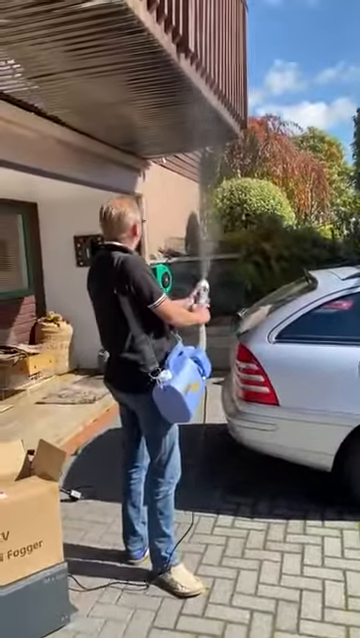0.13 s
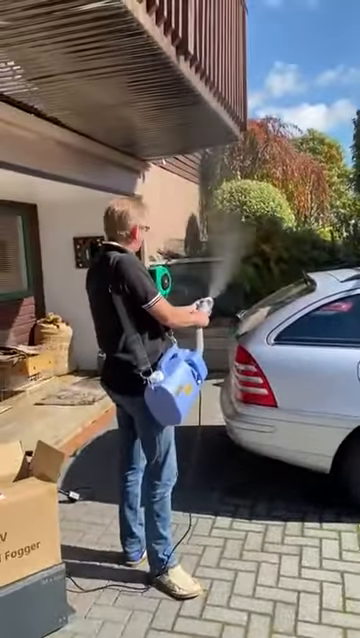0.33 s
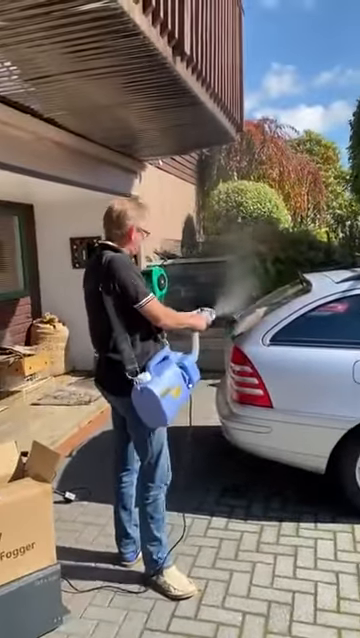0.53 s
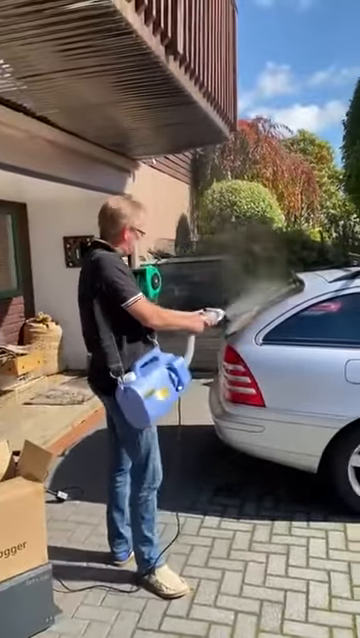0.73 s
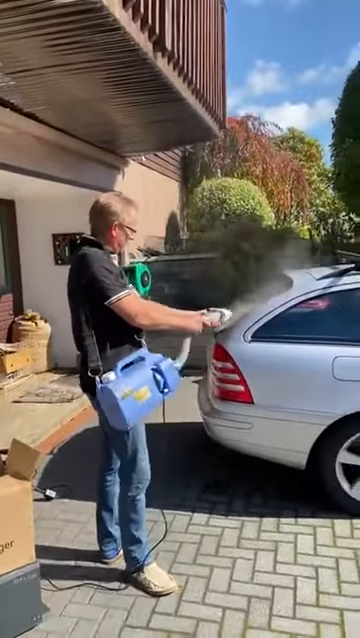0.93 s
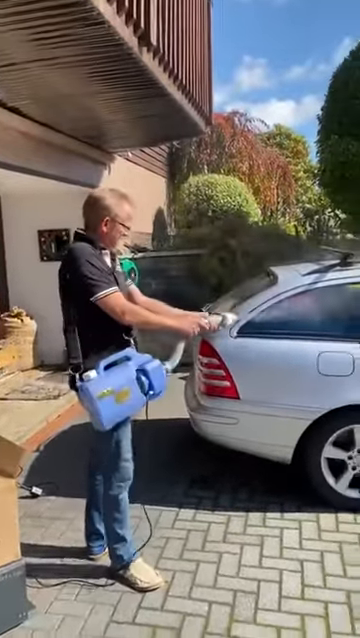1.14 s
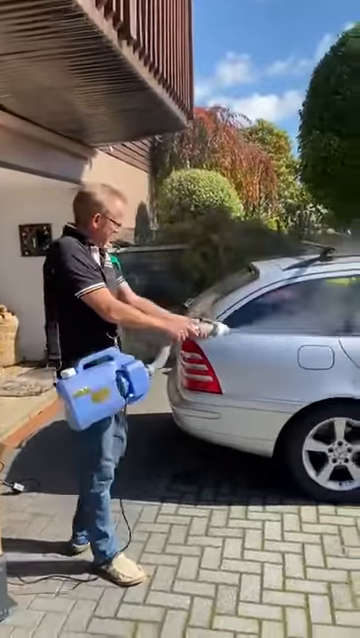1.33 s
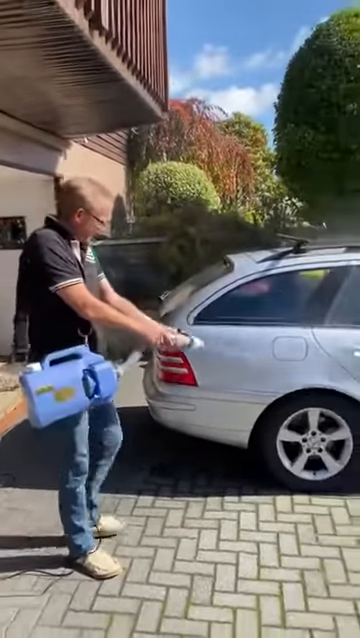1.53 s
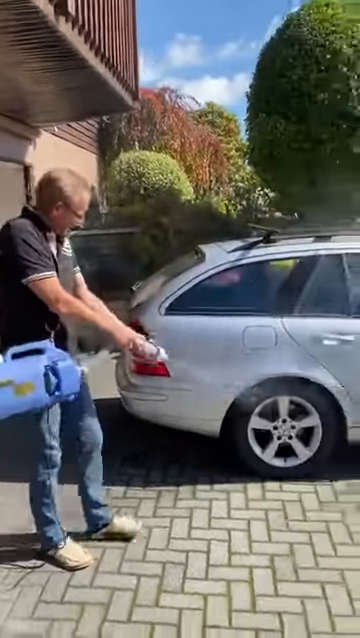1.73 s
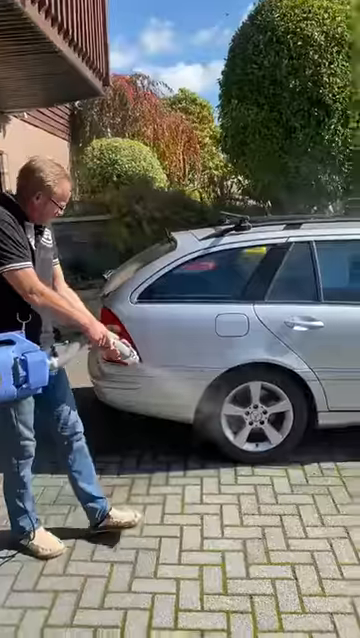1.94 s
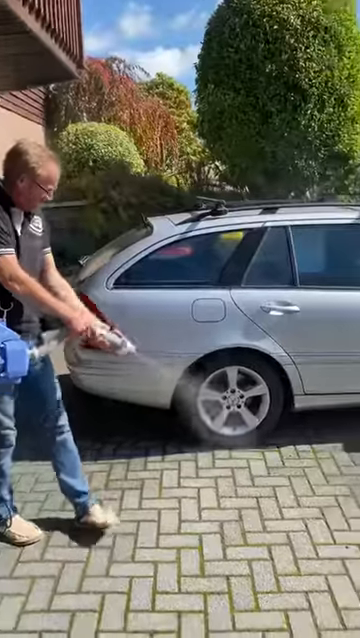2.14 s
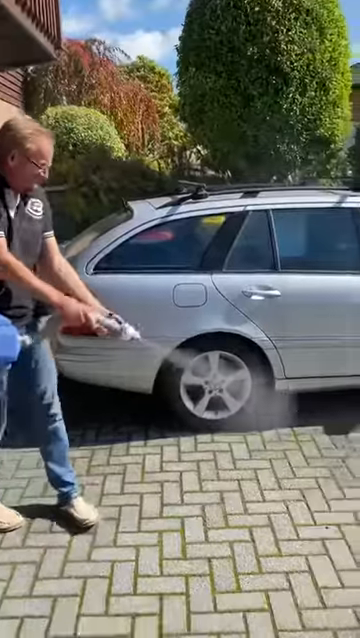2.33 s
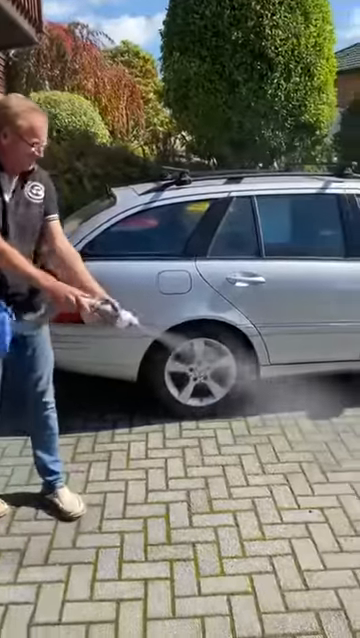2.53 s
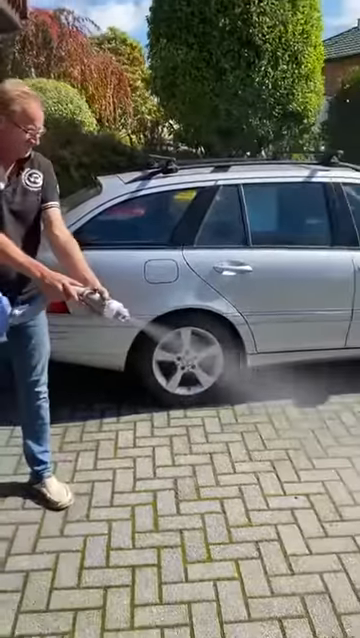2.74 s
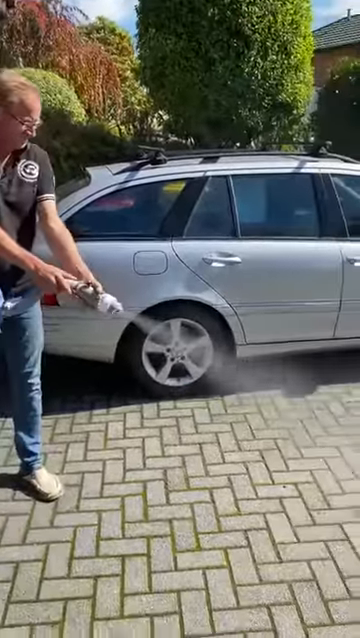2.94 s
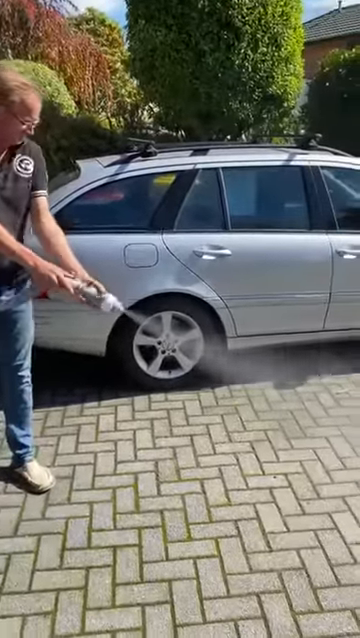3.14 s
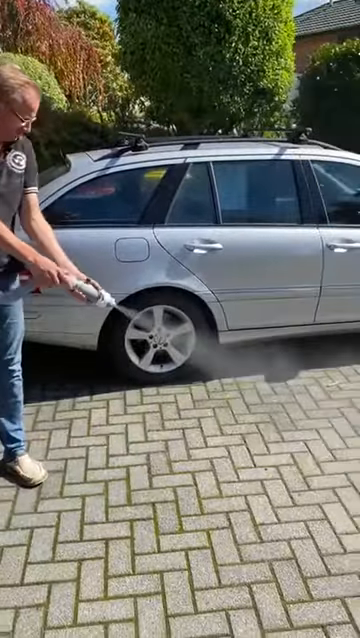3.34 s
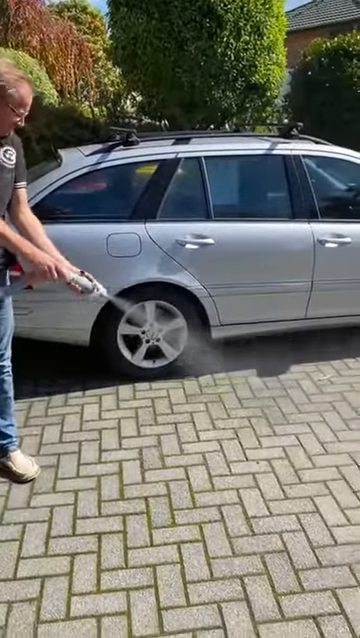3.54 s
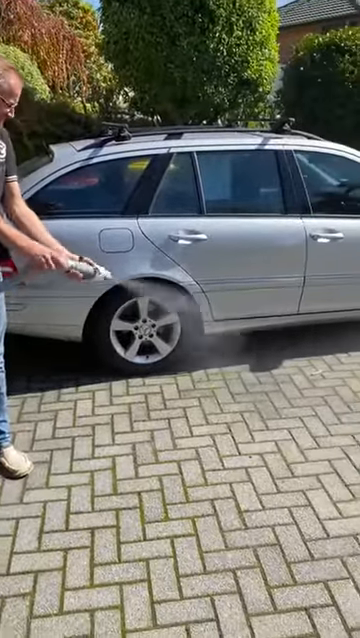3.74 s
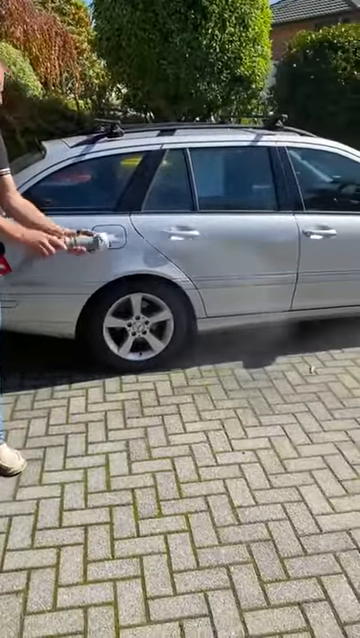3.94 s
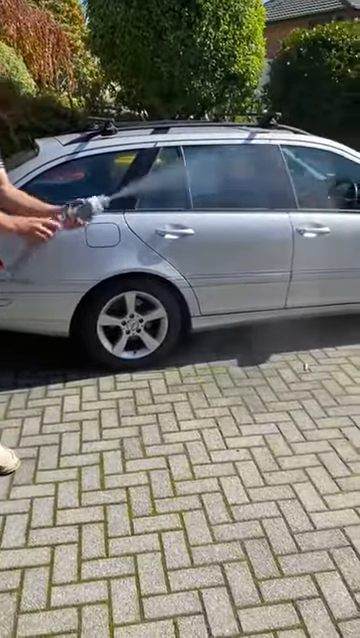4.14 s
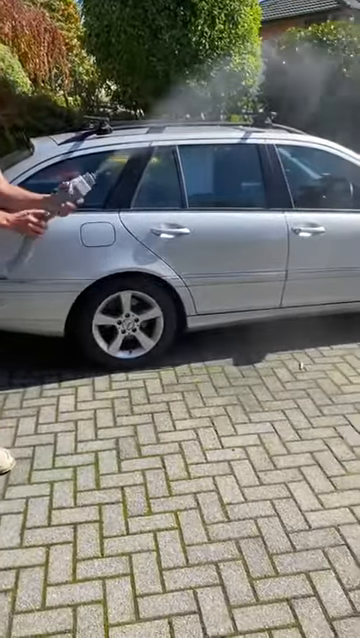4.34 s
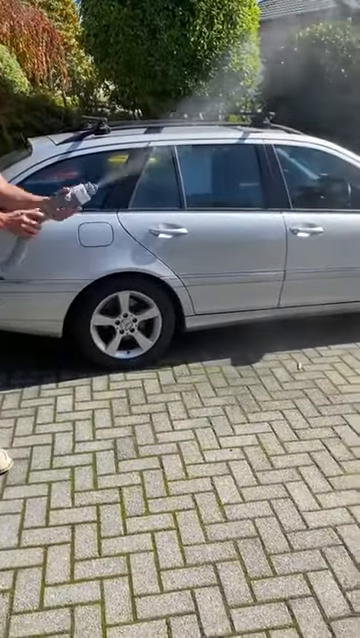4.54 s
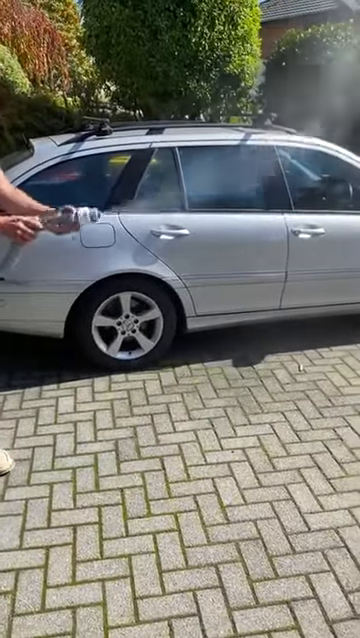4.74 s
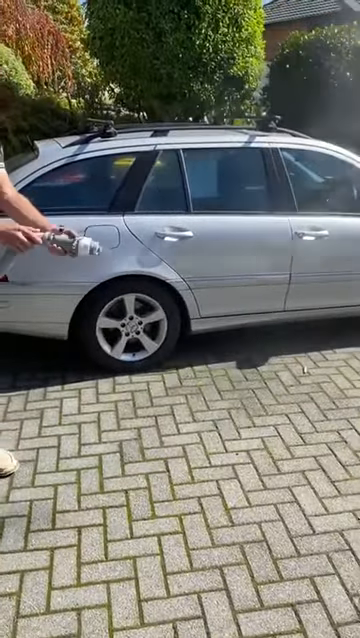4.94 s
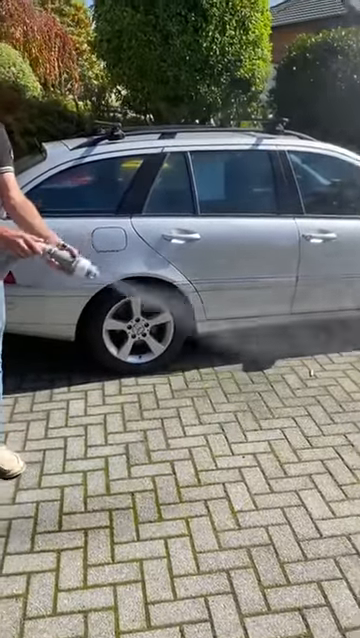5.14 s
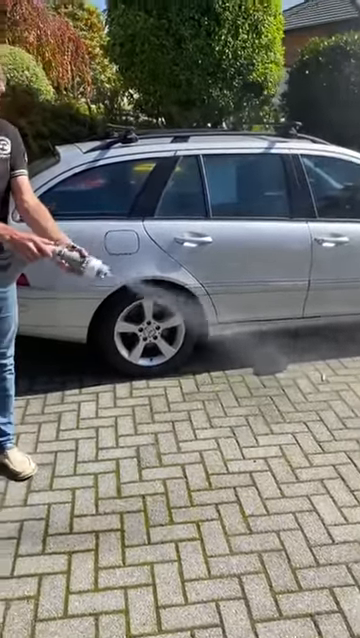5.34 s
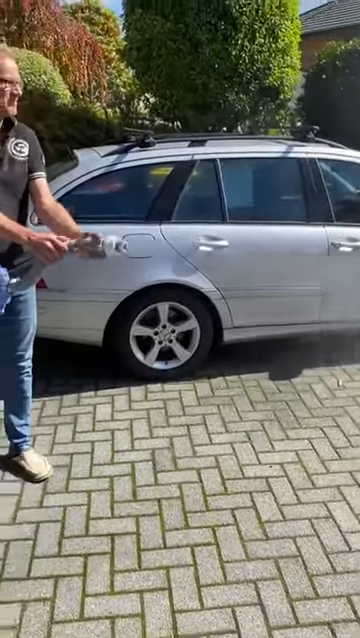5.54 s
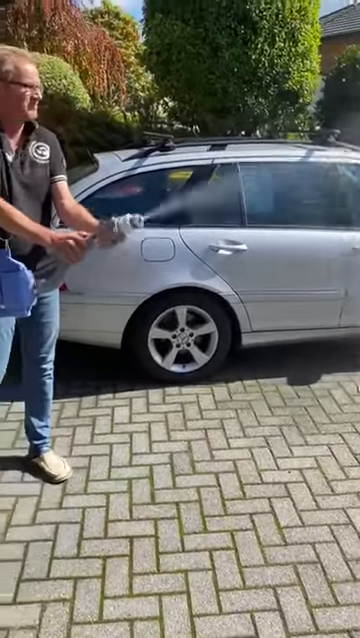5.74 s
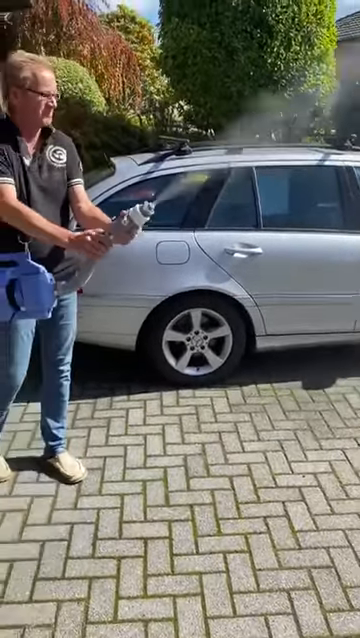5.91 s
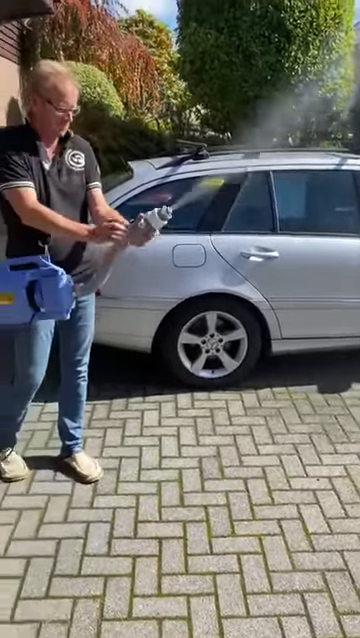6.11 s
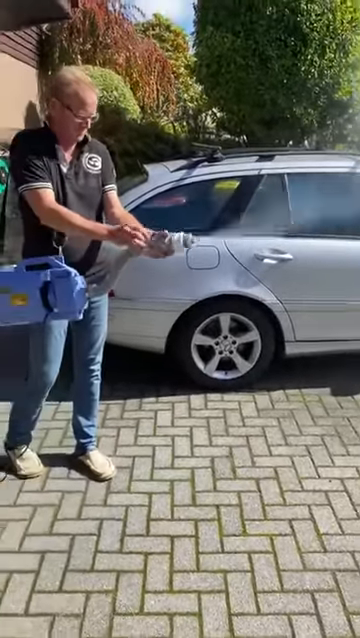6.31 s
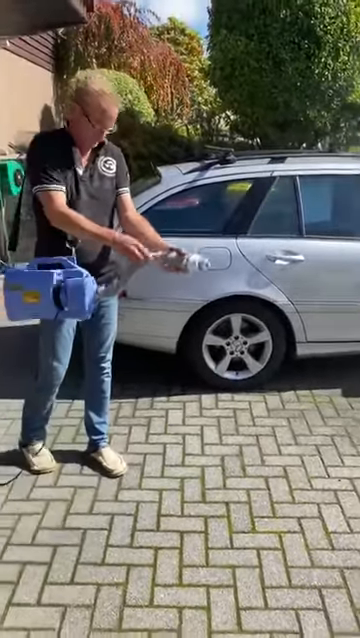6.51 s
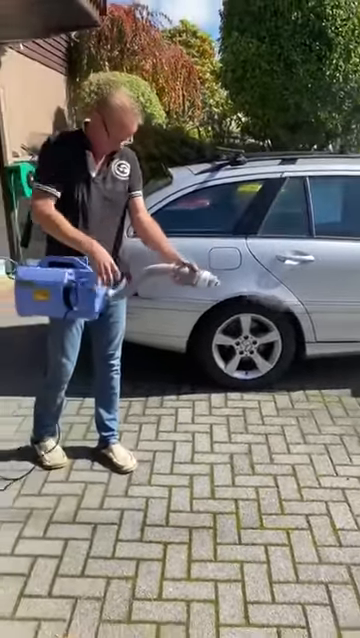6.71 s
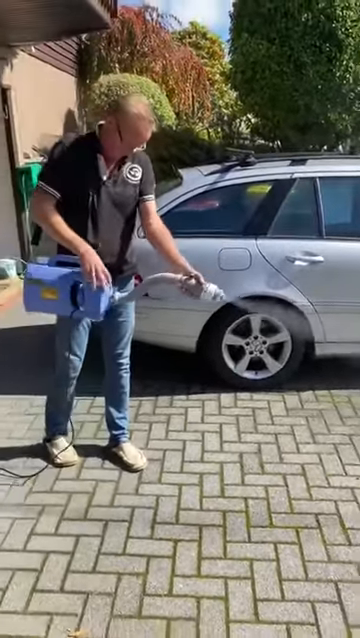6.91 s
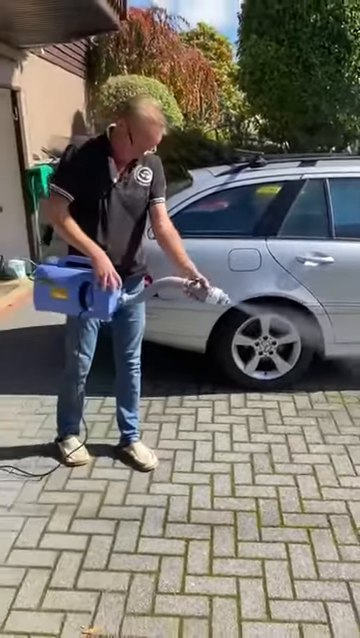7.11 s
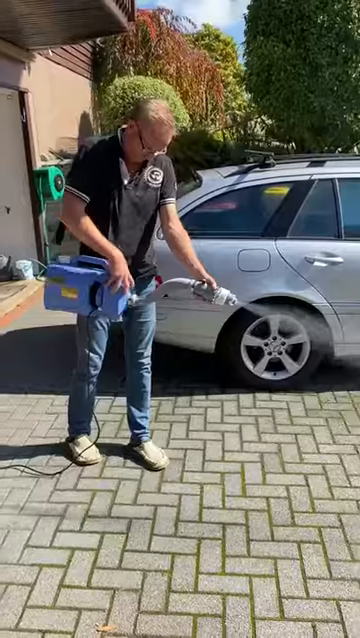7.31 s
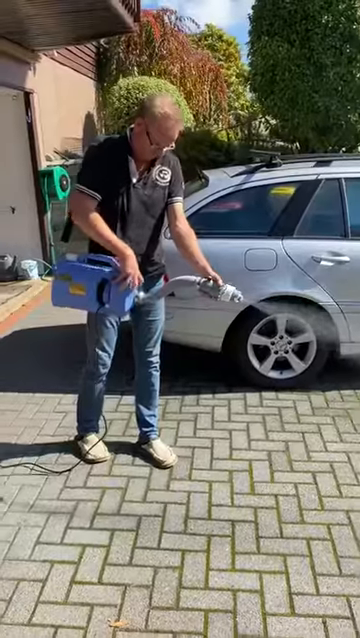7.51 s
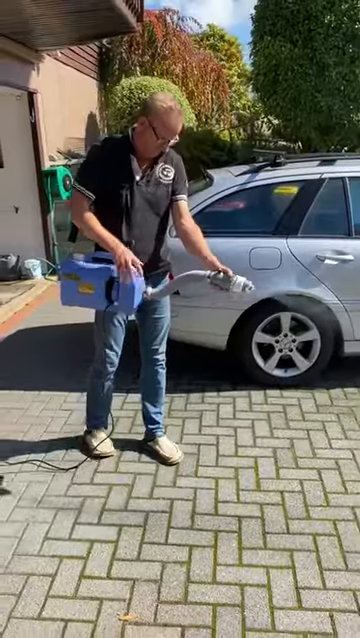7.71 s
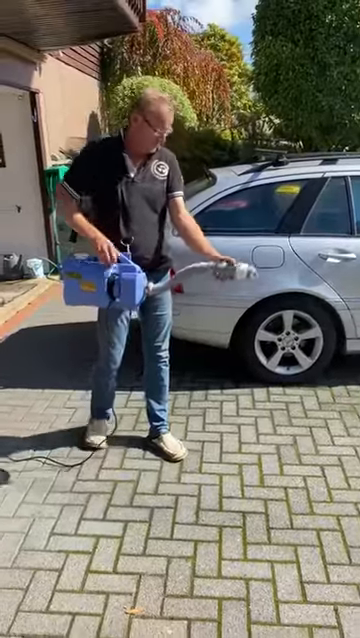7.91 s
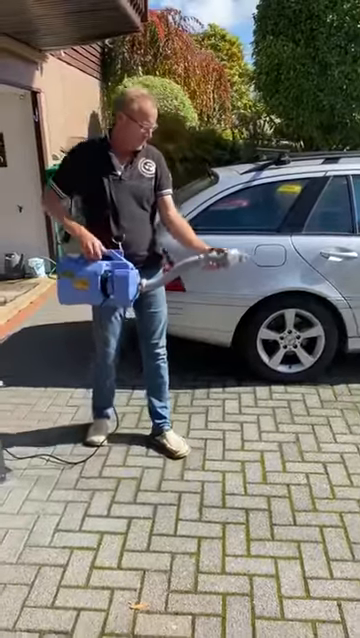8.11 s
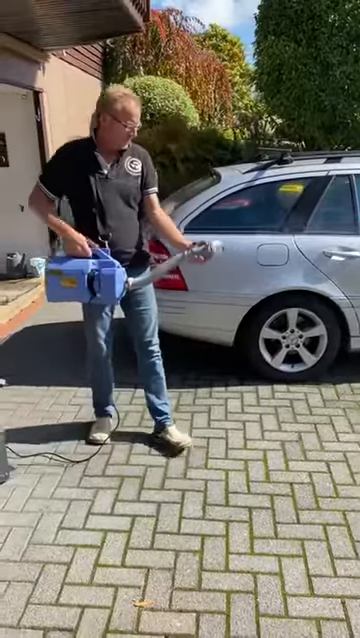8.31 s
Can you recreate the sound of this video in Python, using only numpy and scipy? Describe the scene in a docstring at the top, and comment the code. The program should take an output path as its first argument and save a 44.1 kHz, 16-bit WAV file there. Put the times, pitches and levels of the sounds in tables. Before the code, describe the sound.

From 0 seconds an electric fogger runs at full speed outdoors, a few metres from a stereo phone. Its fan gives a piercing whine around 4.4 kHz, with a lower tone near 630 Hz, both steady in pitch but wavering in loudness and between left and right. Around them is a dense rush of air, with a noisy whistle near 10 kHz. The rush grows fuller over the first two seconds, when a hollow hose hoot near 1 kHz swells at about 1.3 and 1.9. Hiss is brightest around 2.5-3.3, then the roar continues fairly evenly. Paving, car and walls add short, hollow reflections. At 7.4 the power cuts; a very soft low bump follows near 7.6. The whine slides down smoothly, fluttering, while hiss and whistle fade. A faint street murmur rises, and the rotor is still coasting at 8.4.

```python
"""An electric fogger sprays mist on a paved drive, a few metres from a phone with two microphone ports.
From the start the shaft and seven fan blades sing over rushing air, and the motor hums beneath them.
The nozzle whistles near 10 kHz as filtered noise, the hose hoots most in the first two seconds and the housing
drones; paving, car, porch and house wall return delayed copies. At 7.43 s the current stops: a soft bump follows,
the rotor coasts down in pitch, the air dies away and the murmur of the street swells."""
import sys
import numpy as np
from scipy import signal
from scipy.fft import rfft, irfft, next_fast_len
from scipy.io import wavfile
from scipy.ndimage import uniform_filter1d

SR = 44100
rng = np.random.default_rng(int(sys.argv[2]) if len(sys.argv) > 2 else 0)


def put_to_file(sound):
    """Save the sound as 16-bit audio at rate SR, in the file named by the first command-line argument."""
    columns = np.atleast_2d(sound).T  # one column per channel
    safe = np.clip(columns, -1, 1)
    whole_steps = np.round(safe * 32767)
    wavfile.write(sys.argv[1], SR, whole_steps.astype(np.int16))


N = 373074

# Rotor. Shaft rate before the coast-down: time_s, shaft_hz
SHAFT_SPEED = [(0, 628.7), (1.0, 630), (3.0, 628.7), (3.9, 629.1), (5.7, 628.8), (6.7, 627.6),
               (7.42, 627.7)]
# Tones once a turn and once a blade: time_s, left_db, right_db, left_lead_turns
SHAFT_TONE = [(0.03, -40, -41, 0.12), (0.48, -36, -39.5, 0.083), (0.798, -33.5, -44.5, 0.037),
              (1.127, -36, -38, -0.16), (1.606, -29, -27.5, 0.0036), (2.06, -31, -33, -0.0092),
              (2.255, -33.5, -36.5, -0.028), (2.539, -30.5, -33.5, -0.0027), (3.028, -26, -27, -0.03),
              (3.298, -28.5, -29.5, -0.0031), (3.806, -31, -31.5, -0.057), (4.2, -32, -31.5, -0.054),
              (4.51, -36.5, -34, -0.066), (5.12, -32, -33, -0.045), (6.006, -31, -33.2, -0.041),
              (6.43, -29, -29, -0.027), (6.88, -28, -29, -0.021), (7.084, -29, -30, -0.028),
              (7.418, -33.4, -34.3, -0.031), (7.438, -32, -33, -0.04), (7.463, -46, -47, -0.14),
              (7.478, -54, -47.2, -0.23), (7.493, -52.0, -45, 0.05), (7.518, -50.0, -41, 0.06),
              (7.538, -54, -48, 0.12), (7.553, -52.0, -43.0, -0.15), (7.588, -49.2, -39, -0.13),
              (7.623, -40.5, -36, -0.11), (7.653, -37, -35, -0.064), (7.693, -50, -41.1, 0.02),
              (7.717, -54, -46.3, -0.18), (7.762, -49.6, -46.6, -0.12), (7.822, -39.5, -37, -0.029),
              (7.882, -45.7, -45.4, -0.1), (7.917, -42.0, -41.2, -0.09), (8.002, -46.3, -46.0, -0.09),
              (8.047, -41, -41, -0.05), (8.102, -52, -51.0, -0.056), (8.137, -52.0, -52.0, -0.06),
              (8.206, -40.5, -42.8, -0.06), (8.291, -40.5, -40.8, -0.047), (8.326, -42.4, -43.7, -0.04),
              (8.361, -38, -39, -0.035), (8.431, -39, -41, -0.03)]
BLADE_TONE = [(0.03, -34.5, -35, 0.43), (0.299, -32.5, -35, 0.51), (0.354, -42.0, -47.4, 0.69),
              (0.454, -28, -32.5, 0.86), (0.703, -26.5, -44.5, 1.17), (0.768, -25.5, -49.0, 1.12),
              (0.863, -23.5, -35.1, 1.3), (0.918, -28.5, -37, 0.95), (0.968, -29, -36.2, 1.14),
              (1.043, -24, -26.4, 1.18), (1.147, -27, -23.5, 1.15), (1.207, -24, -21, 1.32),
              (1.262, -27, -27.5, 1.3), (1.357, -28.5, -19, 1.26), (1.385, -30, -25, 1.28),
              (1.412, -34.8, -34, 1.3), (1.457, -28, -19.5, 1.47), (1.546, -24, -20.5, 1.26),
              (1.616, -32, -26.1, 1.27), (1.671, -33, -19, 1.35), (1.766, -31, -20.5, 1.14),
              (2.025, -22.5, -22, 1.17), (2.225, -24.5, -22, 1.15), (2.3, -24.2, -23, 1.2),
              (2.434, -27, -28, 1.21), (2.569, -25, -20.5, 1.11), (2.774, -26, -26.2, 1.12),
              (2.868, -28, -26, 1.19), (3.163, -27.2, -22.5, 1.15), (3.342, -37, -22.5, 1.11),
              (3.462, -31, -24.5, 1.26), (3.592, -26.6, -21, 1.06), (3.931, -32.5, -24, 1.08),
              (4.335, -23.5, -20, 1.2), (4.51, -26, -22, 1.19), (4.689, -24.5, -20, 1.2),
              (5.014, -39.6, -31.5, 1.16), (5.039, -38.2, -32, 0.98), (5.09, -27, -29, 0.99),
              (5.128, -27.5, -27.0, 1), (5.413, -30.5, -26, 1.19), (5.857, -22.5, -23.5, 1.22),
              (6.131, -35, -25.5, 1.02), (6.251, -35, -30, 1.13), (6.326, -31, -29.5, 0.86),
              (6.405, -29.4, -24.5, 1.07), (6.49, -33, -26.5, 0.94), (6.605, -24.5, -27.5, 1),
              (6.685, -34.4, -29.5, 1.06), (6.73, -35.1, -43.2, 0.92), (6.75, -32, -48.1, 0.29),
              (6.8, -27.5, -35.7, 0.29), (6.919, -34, -30, 0.3), (6.969, -35, -23.5, 0.29),
              (7.054, -27, -21, 0.055), (7.119, -29.4, -25, 0.14), (7.189, -34.0, -38.5, -0.01),
              (7.224, -35.2, -51.0, -0.089), (7.268, -33, -36.2, 0.24), (7.318, -28, -31.8, 0.18),
              (7.38, -26, -29.5, 0.16), (7.418, -28, -28, 0.11), (7.443, -36.6, -34, 0.26),
              (7.458, -31, -33, 0.15), (7.533, -34.1, -26.5, 0.13), (7.573, -40.5, -47, 0.19),
              (7.638, -31.7, -27, 0.085), (7.702, -38.9, -36.9, 0.06), (7.762, -38.4, -32, 0.13),
              (7.792, -43, -39, -0.03), (7.832, -31, -30, 0.06), (7.862, -40, -36.9, 0.25),
              (7.907, -35, -34.7, 0.14), (7.937, -44, -40.5, 0.23), (7.972, -34, -43, 0.78),
              (8.002, -32, -34, 0.38), (8.037, -35, -41.8, 0.33), (8.077, -34, -30.9, 0.27),
              (8.102, -39, -35, 0.21), (8.141, -33.5, -33, -0.22), (8.181, -37.1, -41.4, -0.62),
              (8.206, -42.3, -39, -0.5), (8.251, -45.8, -26, -0.52), (8.271, -49.0, -29.6, -0.77),
              (8.311, -48, -33, -0.39), (8.345, -39, -36, 0.24), (8.4, -44, -41, 0.1),
              (8.425, -44, -41, 0.25), (8.448, -41, -40, 0.15)]
BLADES = 7
SWITCH_OFF_S = 7.427
COAST_DRAG, BRUSH_DRAG = .736, .036  # per s, per s squared
WALL_MS, WALL_SHARE = 25.45, .16  # delay; amplitude share of the blade tone that comes via the house wall

# Motor. Faint tones that follow the shaft rate: shaft_multiple, level_db
MOTOR_TONES = [(4.397, -48), (12, -59), (14, -53), (21, -52)]
HUM_HZ, HUM_DB = 100., -59

# Air. Region levels at full speed:
# time_s, housing_rumble_db, hose_db, blower_roar_db, upper_roar_db, jet_hiss_db, top_band_db
AIR_LEVELS = [(0, -48, -40.5, -37.5, -38, -36, -44.5), (.8, -48.5, -41.5, -35.5, -36, -35.5, -43),
              (1.1, -46.5, -39.5, -34, -34.5, -35, -41), (1.4, -46.5, -38, -32.5, -35, -33, -40),
              (2.0, -43.5, -35.5, -33, -33.5, -33, -38), (2.281, -44, -38, -34, -33, -31.5, -37),
              (2.55, -45, -38.5, -32, -33.5, -31, -30), (2.9, -44.5, -42.5, -31, -33.5, -30, -31),
              (3.3, -46.5, -42, -33.5, -34, -30.5, -33), (3.5, -46, -40, -32.5, -35, -33.5, -40),
              (3.999, -47, -41.5, -33, -36, -32, -36.5), (4.4, -47, -41, -33.5, -37, -33, -39),
              (4.8, -47, -42, -33.5, -36, -33.5, -38), (5.5, -47, -43, -33, -35, -32.5, -39.5),
              (6.3, -45.5, -44.5, -33, -36, -33.5, -36.5), (6.9, -46.5, -42.5, -34.5, -36.5, -33, -35),
              (7.4, -47.5, -43.5, -34.5, -37, -35.5, -38.5)]
# Frequency regions of the six levels: low_hz, high_hz
AIR_REGIONS = [(250, 550), (800, 1200), (1300, 2700), (2900, 4300), (4700, 9000), (11000, 15000)]
# Relative spectrum of the rush: frequency_hz, density_db (per Hz)
AIR_SPECTRUM = [(25, -39), (50, -27.5), (150, -14), (250, -7), (360, -5.5), (460, -5), (550, -5.5),
                (700, -5.5), (830, -2), (990, -0.5), (1190, -1.5), (1380, 0), (1700, -0.5), (2200, -2.5),
                (2650, -1.5), (3400, -8.5), (4000, -5), (4500, -3.5), (4800, -5), (5200, -5.5), (5600, -4),
                (6500, -3.5), (8500, -6.5), (11500, -11.5), (14300, -9.5), (16000, -19)]
# Exponent of rotor speed that the pressure follows, one per region: speed_power
AIR_SPEED_POWERS = [2.1, 1.07, 1.2, 2.07, 1.96, 4]
AIR_FLICKER_DB, AIR_FLICKER_PER_S = .3, 12
EDDY_DB, EDDY_PER_S = 1.1, 6

# Resonances. Nozzle whistle before the gains of its parts: time_s, centre_hz, level_db
NOZZLE_WHISTLE = [(0, 10000, -39.5), (1.2, 9950, -35), (1.9, 10020, -31.5), (2.3, 9960, -36.5),
                  (2.62, 9950, -29), (2.9, 10020, -29.5), (3.3, 10170, -34), (3.44, 9930, -29.5),
                  (3.9, 10040, -35), (4.2, 10100, -33), (4.7, 10200, -31.5), (5.2, 10050, -40.5),
                  (5.32, 9920, -39), (5.55, 10000, -34), (6.3, 10100, -36.5), (6.5, 9900, -29.5),
                  (7.05, 10190, -35), (7.3, 10190, -30.5)]
# Core and skirt of the whistle: width_hz, gain_db
WHISTLE_CORE_AND_SKIRT = [(45, -0.5), (350, -3)]
WHISTLE_SPEED_POWER = .37  # exponent of rotor speed that the pitch follows
WHISTLE_FADE_DB_PER_S, WHISTLE_FLICKER_DB = 65, 1
# Hoot of the hose: time_s, centre_hz, level_db
HOSE_HOOT = [(0, 1031, -68), (.7, 1042, -52), (1.0, 1000, -44.5), (1.3, 936, -36.5), (1.6, 970, -46.5),
             (1.85, 942, -38.5), (2.1, 990, -50), (2.4, 1006, -50), (2.8, 1000, -60), (4.5, 1017, -61),
             (6.5, 998, -55), (7.4, 1002, -66), (8.46, 1010, -73)]
# Drone of the housing: time_s, centre_hz, level_db
HOUSING_DRONE = [(0.0, 364, -58), (0.42, 365, -51), (0.77, 360, -58), (1.27, 364, -49), (2.57, 361, -51),
                 (2.8, 362.3, -42.5), (3.3, 366.2, -52), (5.8, 360, -55), (7.09, 364, -48),
                 (8.06, 387, -53), (8.22, 376, -44.5), (8.46, 357, -44)]
HOSE_WIDTH_HZ, HOUSING_WIDTH_HZ = 46, 50
BUMP_S, BUMP_HZ, BUMP_DB, BUMP_DECAY_S = 7.575, 48, -53, .018

# Reflections. Extra path via the paving: time_s, delay_ms
PAVING_DELAY = [(0, 2.63), (1, 2.79), (1.6, 2.84), (2.2, 2.79), (3, 2.775), (4, 2.765), (5, 2.8), (6, 2.88),
                (7.3, 2.58), (8.46, 2.6)]
PAVING_DB, DULL_HZ = -8.5, 1650
# Copies from the car and the porch: time_s, delay_ms, level_db
CAR_ECHO = [(0, 1.3, -11), (.6, 1.2, -15), (1.5, 1.196, -15.5), (2.6, 1.22, -14), (3.5, 1.2, -19.5),
            (4.3, 1.2, -20), (5, 1, -16), (5.8, 1.3, -23.5), (6.5, 1.35, -20.5), (7.4, 1.3, -20.5),
            (8.46, 1.3, -17)]
PORCH_ECHO = [(0, 3.8, -21.5), (1.6, 3.95, -17.5), (2.5, 3.9, -22), (3.5, 3.8, -19.5), (5, 3.75, -16),
              (6.3, 3.95, -18), (7.3, 3.7, -22), (8.46, 3.7, -24)]

# Receiver. How the two ports differ:
# frequency_hz, left_lead_turns, right_alone_db (capped at 0), left_minus_right_db
PORT_DIFFERENCES = [(60, 0, -20, 0), (260, -.02, -15, .3), (430, -.05, -13, .4), (780, -.01, -15, .3),
                    (950, 0, -21, 0), (1300, 0, -47, 0), (2030, 0, -45, 0), (2160, 0, -12, -.3),
                    (2330, .03, -6, -2), (2500, .04, -3.5, -5), (2670, .27, -.7, -7), (2840, .38, -2, -1.5),
                    (3020, .3, -1, 0), (3260, 0.069, -3.5, -0.5), (4000, 0.069, -4, -3),
                    (5170, 0.15, 2, .6), (6340, 0.34, -3.5, 1), (7473, 0.473, -3.5, -1), (8160, .5, -43, 0),
                    (11430, .5, -40, 0), (12400, 0.55, -8.5, -0.5), (13870, 0.72, -1.5, 0.5),
                    (15700, .93, 0, -0.5)]
BASS_CUT_HZ, TOP_HZ = 36, 15780

# Street. Swell above the base level: time_s, gain_db
MURMUR_SWELL = [(0, 0), (6.8, -0.5), (7.8, 4.5), (8.46, 6)]
STREET_HZ, STREET_BASE_DB = 120, -65.5


def rotor():
    """Rotating sources: unbalance sings once a turn, blades seven times, with its own swell at each port."""
    shaft_hz = curves(SHAFT_SPEED)[0] / slowing() * (1 + .0003 * walk(30))
    turns = np.cumsum(shaft_hz) / SR
    tones = []
    for multiple, table, flutter_db in ((1, SHAFT_TONE, .5), (BLADES, BLADE_TONE, .9)):
        rows = np.array(table)
        # interpolating amplitude instead of dB gives round swells and sharp dips
        *gain, lead = curves(np.c_[rows[:, 0], undb(rows[:, 1:3]), rows[:, 3]])
        flutter = undb([flutter_db * walk(30) for _ in range(2)])
        cycles = multiple * turns + np.array([lead, 0 * lead])
        tones.append(np.sqrt(2) * np.array(gain) * flutter * np.sin(2 * np.pi * cycles))
    shaft, blades = tones
    return shaft, blades, turns


def wall(tone):
    """Interference: part of the tone arrives late off the house wall and beats with the direct part as pitch falls."""
    late = delayed(tone, WALL_MS)
    return (1 - WALL_SHARE) * tone + WALL_SHARE * late


def motor(turns):
    """Electromagnetic hum and faint tones that follow the shaft rate; levels waver and die with the current."""
    hum = undb(HUM_DB + 1.1 * walk(8)) * np.sin(2 * np.pi * HUM_HZ * np.arange(N) / SR)
    tones = sum(undb(db + 1.7 * walk(5.4)) * np.sin(2 * np.pi * multiple * turns)
                for multiple, db in MOTOR_TONES)
    return np.sqrt(2) * (hum + tones) * powered()


def air():
    """Flow noise: six regions of rush scale as powers of rotor speed; two unrelated rows serve the ports."""
    size, f = spectrum_grid()
    colour = undb(across(AIR_SPECTRUM, f)[0])
    noise = rfft(rng.standard_normal((2, size)))
    rush = np.zeros((2, N))
    for k, (db, (low_hz, high_hz)) in enumerate(zip(curves(AIR_LEVELS), AIR_REGIONS)):
        # neighbouring regions fade into each other between their edges
        at_edges = np.repeat(np.arange(len(AIR_REGIONS)) == k, 2)
        share = np.interp(f, np.ravel(AIR_REGIONS), at_edges)
        # RMS between the region's own edges
        unit = np.sqrt(np.mean(colour ** 2 * (f > low_hz) * (f < high_hz)))
        region = irfft(noise * colour * share / unit, size)[:, :N]
        flickering = undb(db + AIR_FLICKER_DB * walk(AIR_FLICKER_PER_S))
        rush += flickering / slowing() ** AIR_SPEED_POWERS[k] * region
    return rush


def eddies(x):
    """Turbulent intermittency: third-octave bands swell and sink independently."""
    size, f = spectrum_grid()
    place = 3 * np.log2(np.clip(f, 200, 8000) / 200)  # thirds of an octave above 200 Hz
    spectrum = rfft(x, size)
    out = 0
    for k in range(17):
        band = irfft(spectrum * np.maximum(1 - abs(place - k), 0), size)[:, :N]
        out = out + undb(EDDY_DB * walk(EDDY_PER_S)) * band
    return out


def whistle():
    """Flow-excited resonance: turbulence rings the nozzle; pitch wanders, then sags and dies with the flow."""
    hz, db = curves(NOZZLE_WHISTLE)
    db = db + WHISTLE_FLICKER_DB * walk(7.6) - WHISTLE_FADE_DB_PER_S * since_off()
    wander = 1 + .004 * walk(40) + .003 * walk(8.7)
    return undb(db) * ring(hz / slowing() ** WHISTLE_SPEED_POWER * wander, WHISTLE_CORE_AND_SKIRT)


def hose():
    """Tube resonance: the hose hoots near 1 kHz; pitch and strength shift as it bends."""
    hz, db = curves(HOSE_HOOT)
    return undb(db) * ring(hz * (1 + .01 * walk(6)), [(HOSE_WIDTH_HZ, 0)])


def housing():
    """Shell resonance: the plastic housing drones near 360 Hz, louder when it faces the phone."""
    hz, db = curves(HOUSING_DRONE)
    return undb(db) * ring(hz, [(HOUSING_WIDTH_HZ, 0)])


def bump():
    """Damped oscillation: a soft low bump just after the switch-off."""
    t = np.maximum(np.arange(N) / SR - BUMP_S, 0)
    envelope = np.e * t / BUMP_DECAY_S * np.exp(-t / BUMP_DECAY_S)  # peaks at 1
    return undb(BUMP_DB) * envelope * np.sin(2 * np.pi * BUMP_HZ * t)


def echoes(x):
    """Comb filtering: a dull paving copy, then weaker car and porch copies that shift as the nozzle moves."""
    dull = signal.sosfilt(signal.butter(2, DULL_HZ, fs=SR, output="sos"), x)
    direct = x
    x = x + undb(PAVING_DB) * delayed(dull, curves(PAVING_DELAY)[0])
    car_ms, car_db = curves(CAR_ECHO)
    x = x + undb(car_db) * delayed(direct, car_ms)
    porch_ms, porch_db = curves(PORCH_ECHO)
    return x + undb(porch_db) * delayed(dull, porch_ms)


def ports(shared, apart):
    """Phase and coherence: the right port hears shifted, partly other sound, by frequency."""
    size, f = spectrum_grid()
    lead, alone_db, pan_db = across(PORT_DIFFERENCES, f)
    alone = np.minimum(undb(alone_db), 1)
    left = rfft(shared, size)
    mixed = np.sqrt(1 - alone ** 2) * left + alone * rfft(apart, size)
    right = np.exp(-2j * np.pi * lead) * mixed
    return irfft(np.array([left * undb(pan_db / 2), right * undb(-pan_db / 2)]), size)[:, :N]


def street():
    """Ambient noise: a low-passed murmur of the neighbourhood that swells near the end."""
    band = signal.butter(1, [STREET_HZ / 2, STREET_HZ * 2], "band", fs=SR, output="sos")
    low = signal.sosfilt(band, rng.standard_normal(N))
    low = signal.sosfilt(signal.butter(2, STREET_HZ * 2, fs=SR, output="sos"), low)
    return undb(STREET_BASE_DB + curves(MURMUR_SWELL)[0] + 1.2 * walk(2)) * low / np.std(low)


def since_off():
    """Time origin of the coast-down: seconds since the switch-off, 0 before it."""
    return np.maximum(np.arange(N) / SR - SWITCH_OFF_S, 0)


def slowing():
    """Drag law, full over present speed: air drag slows as 1 / (1 + drag t); the brushes add a little."""
    return 1 + COAST_DRAG * since_off() + BRUSH_DRAG * since_off() ** 2


def powered():
    """Exponential decay: 1 while the current flows, then a quick fade."""
    return np.exp(-since_off() / .05)


def ring(hz, parts):
    """Narrow-band noise: slow noise in quadrature on a moving centre; parts are (width_hz, gain_db)."""
    turns, swing = np.cumsum(hz) / SR, 0
    for width_hz, part_db in parts:
        keep = np.exp(-np.pi * width_hz / SR)
        noise = rng.standard_normal((2, N))
        swing = swing + undb(part_db) * signal.lfilter([np.sqrt(1 - keep ** 2)], [1, -keep], noise)
    return swing[0] * np.sin(2 * np.pi * turns) + swing[1] * np.cos(2 * np.pi * turns)


def delayed(x, ms):
    """Propagation delay: each row read ms earlier, fixed or changing."""
    at = np.arange(N) - ms * SR / 1000
    return np.array([np.interp(at, np.arange(N), row) for row in x])


def walk(rate):
    """Random modulation: levels held 1 / rate s and slewed twice; spread near 1."""
    k = int(SR / rate)
    steps = np.repeat(rng.standard_normal(N // k + 1), k)
    return 1.27 * uniform_filter1d(uniform_filter1d(steps, k), k)[:N]


def undb(db):
    """Decibel law: level to amplitude ratio."""
    return 10 ** (np.asarray(db) / 20)


def curves(table):
    """Linear interpolation in time: columns of a table, one value a sample."""
    s, *columns = np.transpose(table)
    return np.array([np.interp(np.arange(N) / SR, s, c) for c in columns])


def across(table, hz):
    """Interpolation in log frequency: columns of a table at the given frequencies."""
    f, *columns = np.transpose(table)
    return [np.interp(np.log(np.maximum(hz, 1)), np.log(f), c) for c in columns]


def spectrum_grid():
    """Discrete spectrum: a fast transform length and its frequencies in Hz."""
    size = next_fast_len(N)
    return size, np.arange(size // 2 + 1) * SR / size


def scene():
    """Superposition: rotor tones carry their own port levels; all other sound passes through the ports."""
    shaft, blades, turns = rotor()
    shared, apart = echoes(eddies(air()))
    shared = shared + motor(turns) + whistle() + hose() + housing() + bump() + street()
    return shaft + wall(blades) + ports(shared, apart)


def record(dry):
    """Band limiting: the phone drops the deepest bass and cuts the top."""
    thin = signal.sosfilt(signal.butter(2, BASS_CUT_HZ, "high", fs=SR, output="sos"), dry)
    return signal.sosfilt(signal.ellip(14, .3, 80, TOP_HZ, fs=SR, output="sos"), thin)


dry = scene()
out = record(dry)
put_to_file(out)
```